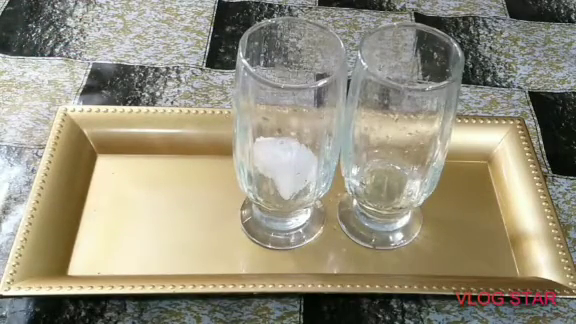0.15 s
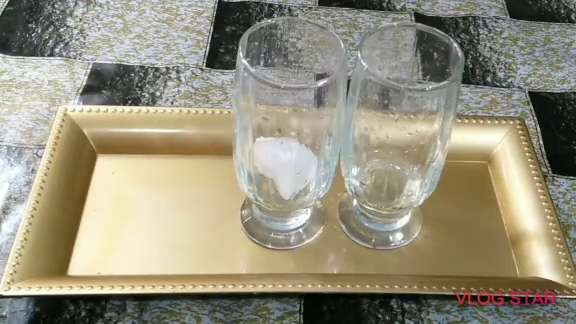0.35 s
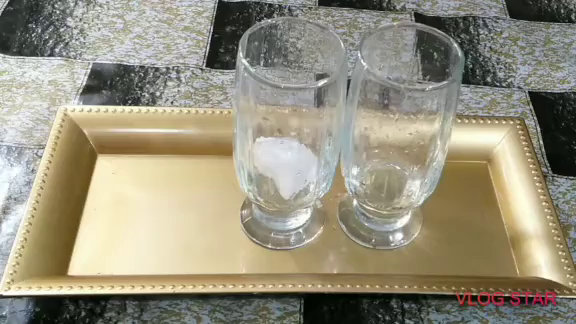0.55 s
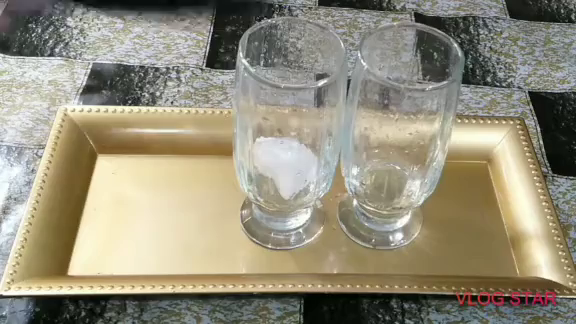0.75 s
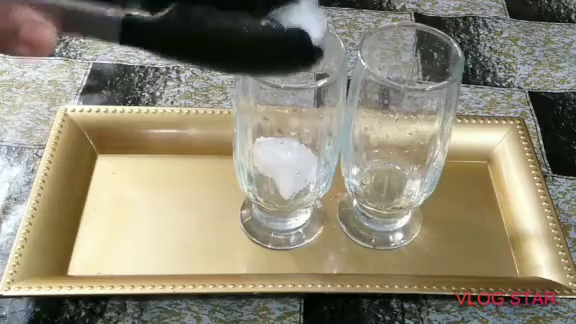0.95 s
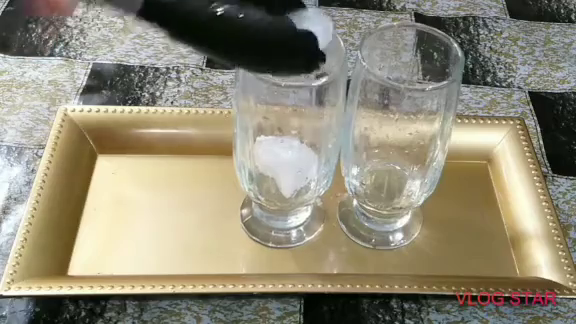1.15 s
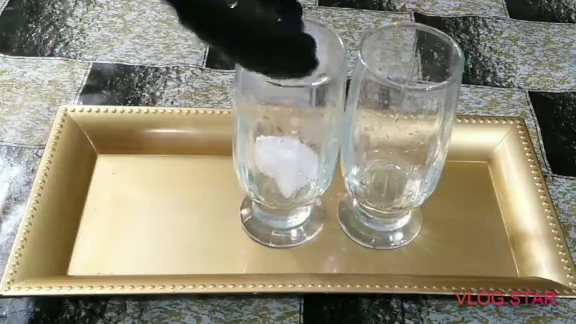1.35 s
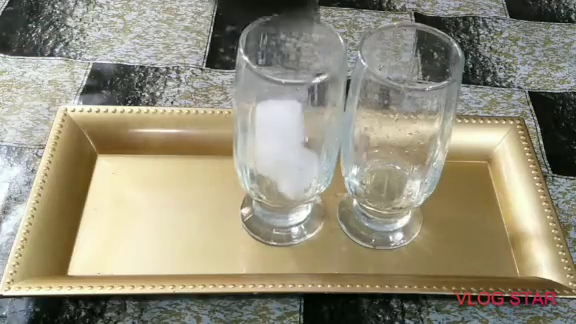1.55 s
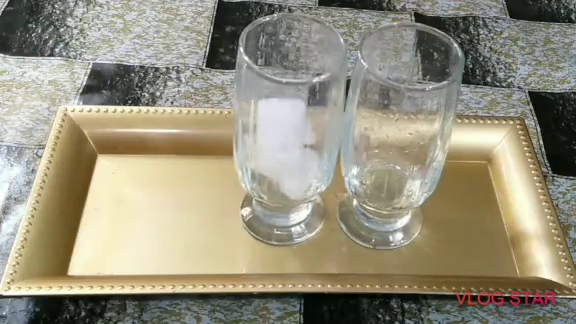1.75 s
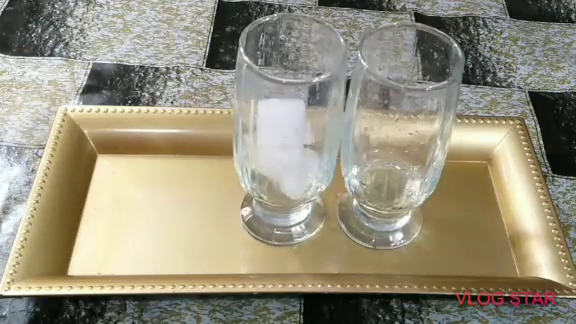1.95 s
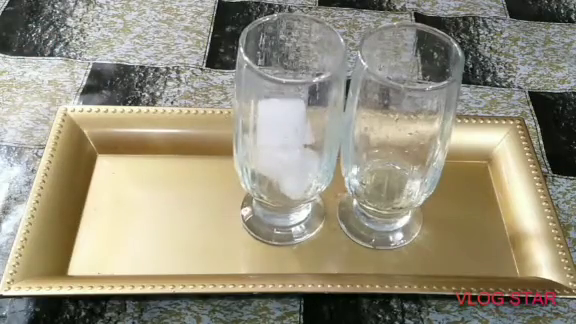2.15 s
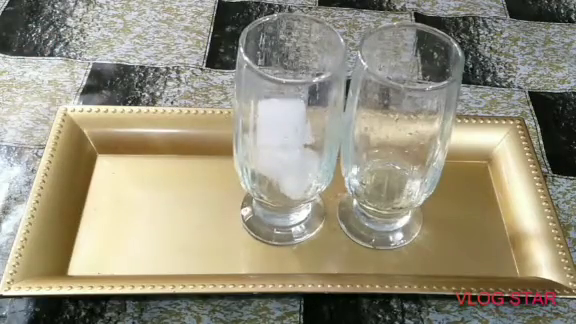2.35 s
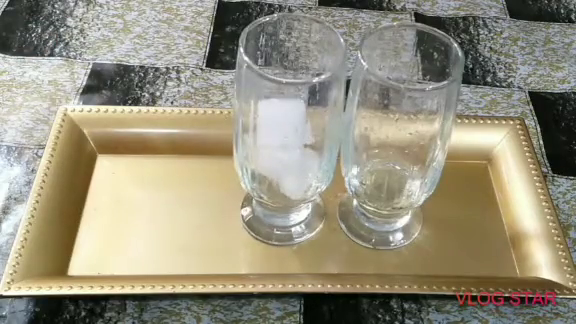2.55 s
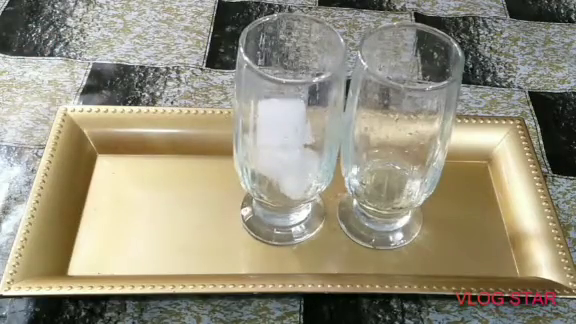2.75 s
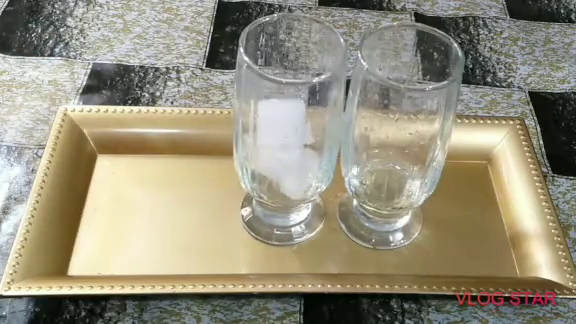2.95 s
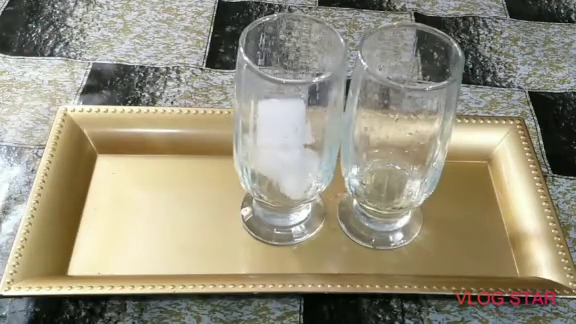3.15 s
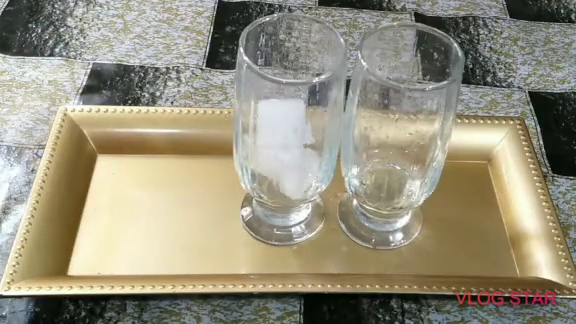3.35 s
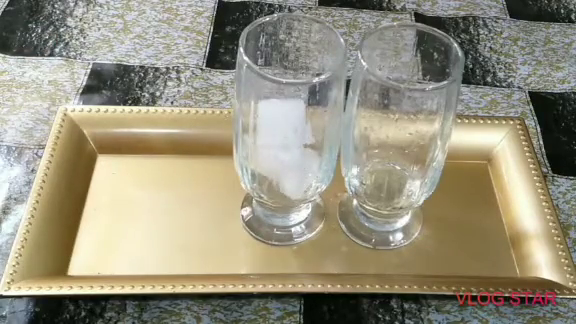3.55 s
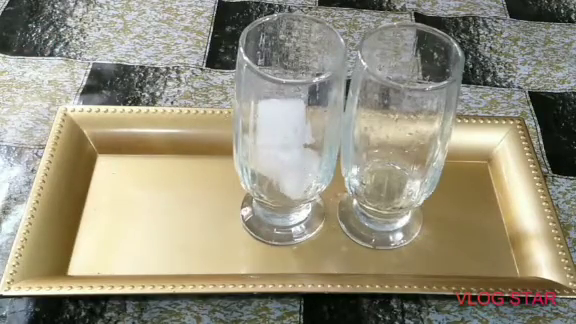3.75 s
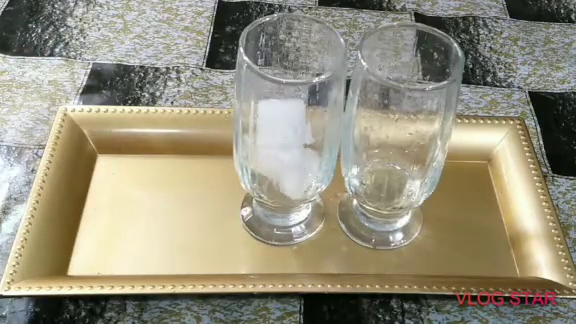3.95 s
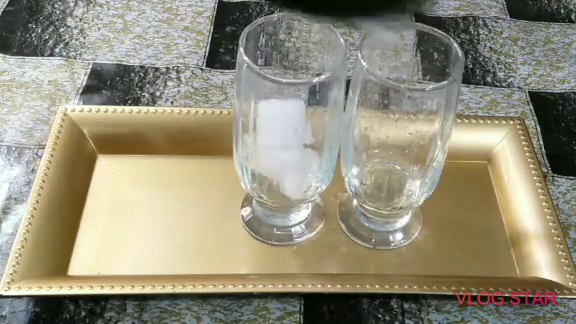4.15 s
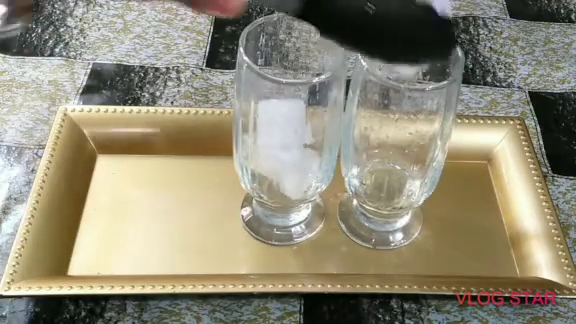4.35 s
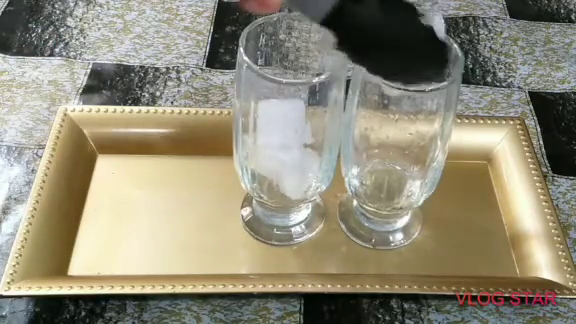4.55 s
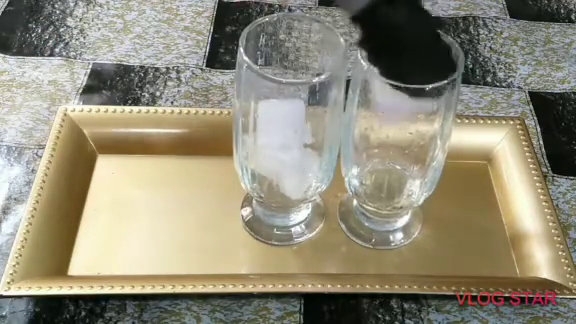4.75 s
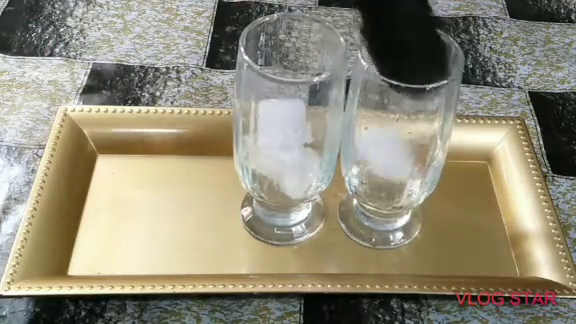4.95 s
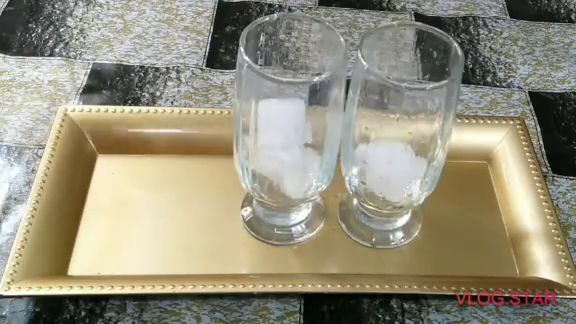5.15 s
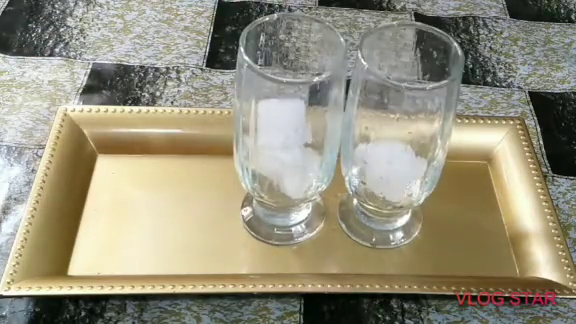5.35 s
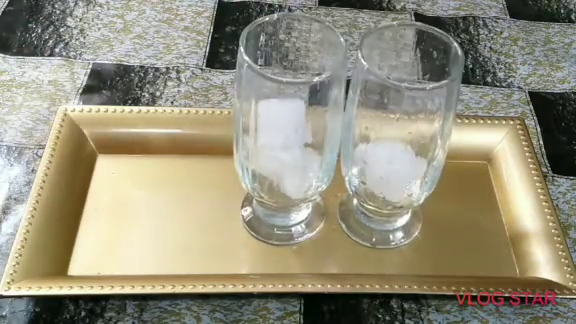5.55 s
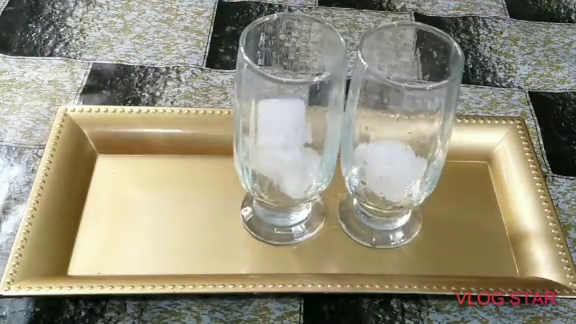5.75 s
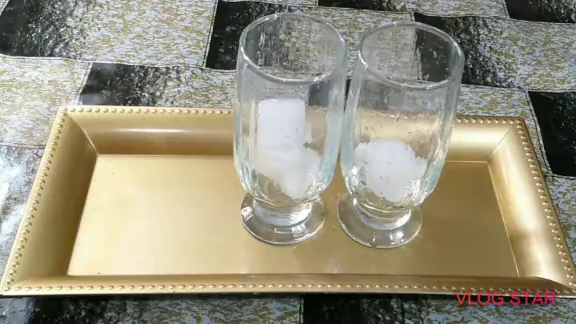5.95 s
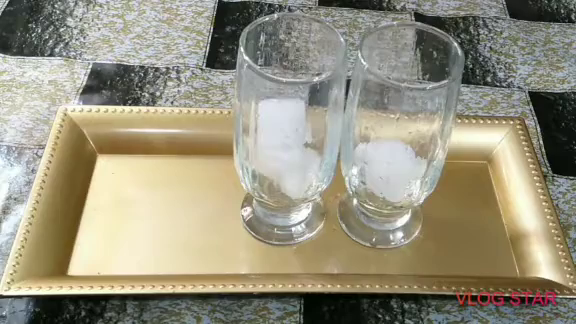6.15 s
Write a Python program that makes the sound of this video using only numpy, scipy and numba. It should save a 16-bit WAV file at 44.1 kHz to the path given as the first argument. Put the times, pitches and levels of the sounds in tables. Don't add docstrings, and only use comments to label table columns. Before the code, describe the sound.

A phone-close stereo take of ice being served: light rustling, faint touches on glass, then a sharp crack and glassy ring that dies fast as ice leans on the wall. Gritty scooping in crushed ice follows, peaking midway. Small ticks lead to another, rounder drop into the second glass with a low table thump. Crunchy digging closes it, over soft room hush and low hum.

```python
import sys
import numpy as np
from scipy import signal
from scipy.fft import rfft, irfft
from scipy.io import wavfile
from scipy.ndimage import uniform_filter1d, map_coordinates
from numba import njit

SR = 44100
rng = np.random.default_rng(int(sys.argv[2]) if len(sys.argv) > 2 else 0)


def invert_db(x):
    u = np.asarray(x, float) / 20
    return 10 ** u


def transcribe(signal):
    frames = np.atleast_2d(signal).T
    limited = np.clip(frames, -1, 1)
    pcm = np.round(limited * 32767).astype(np.int16)
    wavfile.write(sys.argv[1], SR, pcm)


N = 272846
T = np.arange(N) / SR


def level(x, db):
    return x * invert_db(db) / np.sqrt(np.mean(x ** 2))


def colour(x, points, share=1):
    hz, db = np.transpose(points)
    bins = np.maximum(np.fft.rfftfreq(N, 1 / SR), 1)
    return irfft(rfft(x) * invert_db(share * np.interp(np.log(bins), np.log(hz), db)), N)


def band(x, lo_hz, hi_hz):
    sos = signal.butter(2, [lo_hz, min(hi_hz, .45 * SR)], "band", fs=SR, output="sos")
    return signal.sosfilt(sos, x)


def wide(likeness):
    mid, side = rng.standard_normal((2, N))
    return np.array([mid + (1 - likeness) * side, mid - (1 - likeness) * side])


def wander(size, db):
    return level(uniform_filter1d(rng.standard_normal(N), size=size), db)


def swells(s, db, swell_s, fade_s, span_db):
    power = np.zeros(N)
    for at, top_db, up, down in zip(s, db, swell_s, fade_s):
        rise = ((at - T) / max(up, .005)) ** 2
        fall = (T - at) / max(down, .005)
        power += invert_db(2 * (top_db - span_db * np.where(T < at, rise, fall)))
    return np.sqrt(power)


@njit
def ring(push, hz, loss_db):
    out, z = np.empty(len(push), np.complex128), 0j
    for i in range(len(push)):
        if push[i] != 0 or abs(z) > 1e-7:
            z = z * np.exp((2j * np.pi * hz[i] - loss_db[i] * np.log(10) / 20) / SR) + push[i]
        out[i] = z
    return out


def room_hush():
    # (f/Hz, level/dB per Hz)
    hush_colour = [(71, -32.5), (120, 2), (180, -4.5), (240, -4), (306, -10), (415, -8), (1650, -30.5),
                   (4570, -29), (15500, -51)]
    return level(band(colour(wide(0.51), hush_colour), 68, 16000), -71)


def fridge_hum():
    # (f/Hz, level/dB)
    hum_tones = [(236.9, -77.5), (355.3, -88.5), (414.5, -83), (532.9, -86.5), (592.2, -98)]
    out = np.zeros(N)
    for hz, db in hum_tones:
        waver = 1 + .3 * wander(4000, 0)
        out += invert_db(db + 3.5) * waver * np.sin(2 * np.pi * hz * T + 6 * rng.random())
    return out


def rumble():
    # (t/s, table level/dB, tray level/dB, time to fall 20 dB/s)
    bumps = [(.33, -71.5, -100, 1.53), (.72, -61, -68, 0.1), (1.11, -54.5, -54.5, -0.18),
             (1.168, -53, -75.5, -0.07), (1.53, -55.5, -72, 0.4), (1.59, -40, -48, 0.11),
             (1.73, -53, -67, -0.57), (1.91, -70, -87.5, .5), (2.46, -72, -75, 0.8),
             (3.22, -62.5, -74.5, 0.86), (3.96, -63.5, -73, -0.83), (4.12, -61, -78, -0.53),
             (4.37, -60.5, -72, 0.27), (4.45, -55.5, -63.5, 0.32), (4.569, -62, -60.5, 0.5),
             (4.716, -56, -61, 0.23), (4.919, -44, -49, 0.13), (4.981, -37, -35, 0.1633),
             (5.07, -50.5, -51, -0.31), (5.141, -42.5, -49.5, -0.3), (5.27, -68, -79, -1.8),
             (5.62, -57, -72, .2), (5.73, -54, -77.5, 0.05), (6.04, -53, -68, 0.44), (6.15, -55, -70, 0.55)]
    s, table_db, tray_db, fade_s = np.transpose(bumps)
    fade_s = fade_s.clip(.07)
    swell_s = 0.32 * fade_s
    table, tray = wide(.8), wide(.8)
    table = level(band(band(table, 48, 72), 33, 100), 0)
    tray = level(band(tray, 84, 112), 0) * 0 + tray_shake(tray)
    table_gain = invert_db(-83) + swells(s, table_db, swell_s, fade_s, 20)
    tray_gain = invert_db(-78.5) + swells(s, tray_db, swell_s, fade_s, 20)
    return table * table_gain + tray * tray_gain


def loose_chips():
    # (f/Hz, level/dB per Hz)
    ice_colour = [(240, -45.5), (520, -18.5), (780, -26), (1130, -24), (1930, -12), (3260, -8.5),
                  (4580, -2), (11200, -22), (16000, -20)]
    sizes = (rng.random(N) < 4000 / SR) * invert_db(3 * rng.exponential(size=N))
    bunches = invert_db(1.3 * wander(300, 0))
    density = 3.0 + level(uniform_filter1d(sizes, size=40), 0)
    drift = uniform_filter1d(uniform_filter1d(rng.standard_normal(N), size=5000), size=5000)
    late = (T - .00017 - .00005 * level(drift, 0)) * SR
    bands = []
    for lo_hz, hi_hz in (260, 2600), (2300, 7800), (6800, 15000):
        pair = colour(wide(0.097) * density * bunches, ice_colour)
        pair = [port + 0.43 * map_coordinates(port, [late], order=3) for port in pair]
        bands.append(level(band(pair, lo_hz, hi_hz), 0))
    return bands


def digging():
    # (peak t/s, level/dB, swell/s, fade/s, low scrape relative level/dB)
    digs = [(1.44, -50, 0.041, 0.18, -1), (2.43, -46, 0.082, .3, -12.5), (2.49, -38, 0.14, 0.27, -16.5),
            (2.66, -48, 0.21, 0.17, -29), (2.72, -64, 0.071, .2, -21), (2.895, -65, 0.013, 0.28, -21),
            (2.92, -53, 0.027, 0.36, -24.5), (2.97, -54, .08, 0.49, -25), (3.035, -43, 0.076, 0.38, -18),
            (3.085, -45.5, 0.04, 0.33, -2.5), (3.13, -38, 0.095, 0.32, -9.5),
            (3.19, -41.5, 0.16, 0.37, -4.5), (3.26, -41.5, 0.11, 0.22, -4), (3.3, -34, 0.0074, 0.14, -10),
            (3.33, -36, 0.066, 0.16, -13), (3.43, -50, 0.034, 0.21, -22.5), (3.49, -48.5, 0.092, 0.19, -15),
            (3.57, -55.5, 0.0065, .14, -20), (3.848, -60.5, 0.0067, 0.13, -4),
            (4.111, -75.5, 0.0051, .15, -11.5), (4.238, -63, 0.0061, .12, -27),
            (4.548, -50, 0.0088, 0.089, -14.5), (4.8, -57, 0.011, 0.077, -14),
            (4.94, -42.5, 0.098, 0.015, -27), (5.949, -46.5, 0.013, 0.35, -27),
            (5.97, -41, 0.033, 1, -11.5), (6.066, -39.5, 0.11, 0.091, -8), (6.112, -36, 0.079, 0.66, -6.5),
            (6.187, -32, 0.19, .55, -9.5)]
    rustles = [(.016, -49, 0.13, 0.15, -7), (.096, -43.5, 0.11, 0.18, -2.5), (.195, -47.5, 0.52, 0.14, -9),
               (.35, -73.5, 0.58, 0.19, 4), (.936, -66, 0.012, 0.19, -9), (2.75, -62.5, 0.035, 0.081, -30),
               (4.538, -64.5, 0.024, 0.033, 0.5), (4.64, -77.5, 0.14, 0.13, -10),
               (4.69, -64.5, 0.019, 0.16, 1), (4.772, -55.5, 0.028, .15, -8)]
    slides = [(.576, -63, 0.041, 0.25, -10), (.67, -78, 0.17, 0.33, 8.5), (2.23, -66, 0.096, 0.44, -3.5),
              (3.692, -62, 0.0058, 0.19, -27.5), (3.96, -81.5, 0.19, 0.15, -4),
              (4.47, -82, 0.41, 0.42, 0.5), (4.882, -31, 0.072, 0.04, -22), (5.14, -52, 0.14, 0.093, 0.5),
              (5.6, -89, 0.42, 2.4, 7.5)]
    # (f/Hz, level/dB)
    rustle_tilt = [(2600, -2), (4500, -12.5), (6500, 9.5), (9000, 10.5)]
    low, mid, high = loose_chips()
    out = np.zeros((2, N))
    for rows, body, hiss_db in (digs, mid, -1.5), (rustles, colour(mid, rustle_tilt), 5.5), (slides, mid, -28):
        s, db, swell_s, fade_s, low_db = np.transpose(rows)
        out += swells(s, db, swell_s, fade_s, 40) * (body + invert_db(hiss_db) * high)
        out += swells(s, db + low_db, swell_s, fade_s, 40) * low
    return out


def short_rings():
    # (t/s, peak level/dB, f/Hz, time to fall 60 dB/s)
    rings = [(.932, -59, 6000, .05), (1.195, -40.5, 1820, 0.14), (1.196, -40.5, 4540, 0.057),
             (1.409, -72, 4100, .05), (1.433, -50.5, 3546, 0.059), (1.529, -21, 4780, 0.074),
             (2.409, -43, 4550, .02), (2.649, -34, 4520, 0.022), (2.746, -48, 4356, 0.022),
             (2.919, -48.5, 3730, 0.035), (3.318, -39.5, 1902, 0.086), (3.567, -49.5, 3870, 0.037),
             (3.689, -54, 5060, 0.046), (3.846, -58, 2290, 0.075), (4.109, -62, 6720, 0.045),
             (4.235, -54, 5464, 0.072), (4.543, -33.5, 4890, 0.048), (4.545, -38, 6100, 0.047),
             (4.692, -48.5, 1700, 0.071), (4.692, -47.5, 2800, .06), (4.771, -47.5, 4930, 0.1),
             (4.8465, -32, 4200, 0.055), (4.863, -30, 2980, 0.12), (4.8805, -39, 5040, .06),
             (4.952, -18.5, 1997, 0.077), (4.9525, -25.5, 2990, 0.085), (4.953, -29.5, 4690, .05),
             (5.113, -42.5, 2330, .05), (5.1135, -42.5, 4180, .05), (1.64, -42, 820, .12),
             (1.695, -46, 820, .15), (6.08, -53, 870, .12), (6.118, -49.5, 880, .1), (6.144, -43, 460, .15),
             (6.168, -46, 640, .1), (1.068, -54, 860, 0.079), (1.09, -58.5, 718, .15),
             (1.33, -60.5, 4210, 0.048), (3.078, -55, 505, 0.077), (3.241, -48, 480, .08)]
    out, t = np.zeros((2, N + 8192)), T[:8192]
    for (s, db, hz, t60), (apart, lag) in zip(rings, rng.random((60, 2))):
        upper_hz = hz * (1.02 + .03 * apart)
        pair = np.array([np.sin(2 * np.pi * hz * t + phase) + 1.2 * np.sin(2 * np.pi * upper_hz * t - phase)
                         for phase in (lag, -lag)])
        fade = invert_db(db - 60 * t / max(t60, .01)) * np.clip(t / 0.0012, 0, 1)
        out[:, int(s * SR):][:, :len(t)] += fade * pair
    return out[:, :N]


def cracks():
    # (t/s, peak level/dB, f/Hz)
    contacts = [(0.9316, -51, 6400), (1.5253, -24, 4740), (1.5714, 7, 5850), (2.7473, -49, 4370),
                (2.92, -44, 3650), (3.2983, -19, 4520), (3.5665, -48, 3920), (3.691, -54, 5050),
                (4.235, -57, 5460), (4.542, -26, 5130), (4.828, -30.5, 5320), (4.9514, 1, 2970),
                (5.113, -28, 3700)]
    out, t = np.zeros(N), T[:256]
    for s, db, hz in contacts:
        turns = t * hz - 1.5
        out[int(s * SR):][:len(t)] += invert_db(db - 1.0) * np.sin(2 * np.pi * turns) * np.exp(-(turns / 0.56) ** 2)
    return out


def rattle(db, hz, t60, fall_db):
    t = T[:16384]
    bins = np.maximum(np.fft.rfftfreq(len(t), 1 / SR), 1)
    mid, side, patches, peaks, bounce = rng.standard_normal((5, len(t)))
    octaves = np.log2(bins / hz)
    below_db = 6 * octaves - 12 * np.maximum(np.log2(900 / bins), 0)
    slope_db = np.where(octaves < 0, below_db, -fall_db * octaves)
    slope_db -= 11.5 * np.maximum(np.log2(bins / 8500), 0)
    slope_db += level(uniform_filter1d(patches, size=180), 11)[:len(bins)]
    slope_db += level(uniform_filter1d(peaks, size=24), 13)[:len(bins)]
    noise = rfft([mid + 1.1 * side, mid - 1.2 * side])
    out = level(irfft(noise * invert_db(slope_db), len(t)), db - 13.0)
    skips_db = level(uniform_filter1d(bounce, size=200), 12)
    return out * invert_db(skips_db - 60 * t / max(t60, .02)) * (1 - np.exp(-(t / .0012) ** 2))


def air_column(puff, rattling):
    # (t/s, f/Hz)
    air_pitch = [
        (1.075, 885),
        (1.092, 735),
        (1.5, 780),
        (1.62, 815),
        (1.9, 827),
        (4.9, 652),
        (4.945, 685),
        (5.1, 714),
        (6.0, 500),
    ]
    swell = np.hanning(int(0.00792 * SR))
    swell = swell / swell.sum() * np.exp(2j * np.pi * 740 * T[:len(swell)])
    push = np.convolve(puff, swell)[:N] + invert_db(-45) * rattling.mean(axis=0)
    air_hz = np.interp(T, *np.transpose(air_pitch)) * (1 + wander(400, -27.5))
    air = ring(push, air_hz, np.full(N, 60 / .085))
    air += invert_db(-10.0) * ring(push, 1.4 * air_hz, np.full(N, 900.))
    return band(band(air.imag, 440, 990), 450, 1500) * invert_db(np.array([[1.5], [-1.5]]))


def knocks():
    # (t/s, rattle level/dB, centre f/Hz, air level/dB, time to fall 60 dB/s)
    drops = [(1.0695, -58.5, 1500, -80, 0.32), (1.1124, -60, 3940, -78, 0.14),
             (1.1896, -29, 3300, -61, 0.15), (1.1987, -21.5, 3070, -60, 0.16),
             (1.2185, -30.5, 2970, -80, 0.098), (1.318, -57, 3960, -86, 0.22),
             (1.408, -50, 4150, -90.5, 0.22), (1.528, -10, 4842, -30, 0.27), (1.568, 0, 6820, -40, 0.11),
             (1.5802, -2, 6624, -46, 0.082), (1.6021, -9, 5790, -53.5, 0.27),
             (1.6219, -24.5, 3538, -42, 0.32), (1.6712, -15.5, 3620, -43, 0.15),
             (1.7177, -22.5, 3350, -47.5, 0.18), (1.7748, -41.5, 3270, -64, 0.26),
             (4.5426, -32, 5920, -62.5, 0.16), (4.6914, -30.5, 3800, -65, 0.16),
             (4.769, -31, 5200, -77, 0.12), (4.8262, -33, 5180, -70.5, 0.17),
             (4.8485, -26.5, 3000, -68, 0.3), (4.8642, -20, 3002, -70, .15),
             (4.8807, -13.5, 4920, -47, 0.11), (4.8944, -38, 3110, -38.5, 0.151),
             (4.9505, -10, 2263, -20, 0.1), (4.9894, -26, 2095, -50.5, 0.32),
             (5.0296, -41, 2110, -50.5, 0.16), (5.0779, -38.5, 7200, -62, 0.34),
             (5.098, -33, 3520, -56.5, 0.13), (5.1116, -44, 3520, -50, 0.12), (5.135, -60, 4000, -58, .15)]
    # (t/s, rattle level/dB, centre f/Hz, hollow level/dB, treble fall/dB per octave)
    ticks = [(0.0922, -24.5, 5540, -49, 25), (0.932, -50, 6000, -82, -9), (2.6484, -64, 4480, -71.5, 18),
             (2.7444, -70, 4290, -91, 8), (2.9174, -44, 3700, -86.5, 6.5), (3.3242, -25, 4870, -74, 10),
             (3.5672, -63, 3900, -91.5, 18), (3.689, -49, 5160, -84, 1.5),
             (3.8454, -47.5, 2257, -95.5, 3.5), (4.11, -52.5, 6820, -89.5, 3.5),
             (4.2346, -43.5, 5520, -82, -3), (5.9494, -53, 4810, -75, 4), (6.1484, -39, 4720, -60, 11)]
    events = [(*row, 12 + 4 * np.log2(row[2] / 4000)) for row in drops]
    events += [(*row[:4], 0.21, row[4]) for row in ticks]
    out, puff = np.zeros((2, N)), np.zeros(N, complex)
    for s, db, hz, air_db, t60, fall_db in sorted(events):
        i = int((s - .0005) * SR)
        one = rattle(db, hz, t60, fall_db)
        out[:, i:i + one.shape[1]] += one[:, :N - i]
        puff[i] = invert_db(air_db + 8.0)
    return out + air_column(puff, out)


def glass(pitches, modes, blows, rests, spare_lows):
    family_edges_hz = (2500, 5000)
    s, *family_db, twin = np.transpose(blows)
    at = (s * SR).astype(int)
    leaning = np.interp(T, *np.transpose(rests)).clip(0)
    touch = np.hanning(int(0.00086 * SR))
    touch = touch / touch.sum()
    wobble = wander(500, -54)
    out = np.zeros((2, N))
    last_hz = 0
    for hz, (db, t60, pan_db, lead) in zip(pitches, modes):
        paired, last_hz = abs(hz - last_hz) < 25, hz
        spot = spot if paired else rng.standard_normal((len(s), 2)).T
        blow_db = db + family_db[np.digitize(hz, family_edges_hz)] + 2 * spot[0]
        push = np.zeros(N, complex)
        push[at] = invert_db(blow_db) * np.exp(1j * spot[1]) * (twin.clip(-1, 1) if paired else 1)
        push = np.convolve(push, touch * np.exp(2j * np.pi * hz * T[:len(touch)]))[:N]
        loss_db = 60 / t60 + leaning * min(hz / 3500, 1.2) ** spare_lows
        z = ring(push, hz * (1 + wobble * hz / 8000), loss_db)
        lag = np.exp(.5j * lead)
        out += [invert_db(pan_db / 2) * (z * lag).imag, invert_db(-pan_db / 2) * (z / lag).imag]
    return out


def right_glass():
    pitches = [1665.3, 1658.8, 3547, 3540, 6418, 7419, 5800, 7480, 8100, 10050, 12200, 13700, 14600]
    # (level/dB, time to fall 60 dB/s, left minus right/dB, left leads/rad)
    modes = [(0, 1.2, -3, .5), (0, 1.2, -3, .5), (3, 1.0, -3, .3), (3, .8, -3, .3), (-3, .2, 0, .5),
             (-2, .25, 0, .5), (-10, .1, 0, .5), (0, .15, 0, .5), (-4, .3, 0, .5), (-10, .2, 0, .5),
             (-10, .3, 0, .5), (-10, .3, 0, .5), (-12, .3, 0, .5)]
    # (t/s, low modes level/dB, middle level/dB, high level/dB, share of the twin modes -1..1)
    blows = [(1.192, -62, -46, -52, 0.16), (1.199, -62, -43, -50, 0.3), (1.213, -57, -46, -50, 0.4),
             (1.573, -32.5, -42.5, -28, 1), (1.598, -72, -11.5, -61.5, -0.77),
             (1.615, -69.5, -45, -33, -.5), (1.672, -75, -32, -36.5, -0.04), (1.723, -75, -56, -47, 0.73),
             (4.543, -58, -68, -53.5, .85), (4.689, -56, -54, -54, .85), (4.782, -61, -65, -61, .85),
             (4.876, -44.5, -42.5, -39.5, 0.82), (4.892, -42.5, -40.5, -37, 0.96),
             (4.951, -40, -43.5, -52.5, 0.58), (5.078, -80, -55, -45, 0.59), (5.112, -55, -61.5, -53, .7),
             (5.133, -85, -76, -54, .7)]
    # (t/s, extra loss/dB per s)
    rests = [(1.2, 260), (1.5, 100), (1.59, 29.7), (1.66, 40), (1.7, 121), (1.78, 148.4), (1.9, 220),
             (2.1, 298.9), (4.5, 645), (4.9, 600), (5.05, 503), (5.12, 201), (5.3, 300)]
    return glass(pitches, modes, blows, rests, spare_lows=1.37)


def left_glass():
    pitches = [1738.5, 1723, 2835, 3261, 3241, 5783, 7230, 7284, 7378, 8248, 4480, 5380, 6945, 7575, 9230,
               9560, 11900, 12300, 12600, 13310, 14200]
    # (level/dB, time to fall 60 dB/s, left minus right/dB, left leads/rad)
    modes = [(1.5, 1.0, -3.5, -0.78), (3, 1.0, -5, -1.4), (-3, .12, 1, -0.18), (8.5, 0.2, -1, -2.5),
             (9, .7, -2.5, -2.5), (7, 0.15, 12.5, -2.5), (6.5, .18, 3.5, 3.5), (1, 0.5, 3.5, 2.5),
             (1, 0.26, 3.5, 2), (-2, 0.22, 1.5, -0.43), (-18.5, .2, 0, .5), (-16, 0.15, 0.5, .5),
             (-8.5, .2, 0, .5), (-6, .15, 0.5, .5), (-17, .5, 3, 2.5), (-17, .2, -0.5, .5),
             (-20, .45, 0, .5), (-21, .4, 0, .5), (-21, .45, 0, .5), (-15.5, .45, 3, -2.5),
             (-23.5, .15, 0, .5)]
    # (t/s, low modes level/dB, middle level/dB, high level/dB, share of the twin modes -1..1)
    blows = [(1.067, -77, -97, -99, 0.27), (1.193, -54.5, -51.5, -55.5, 0.16), (1.198, -52, -54, -50, 0.61),
             (1.532, -33.5, -54, -38, 0.088), (1.571, -13, -17.5, -15, -0.48),
             (1.601, -45.5, -37, -22.5, 0.57), (1.645, -50, -42, -48.5, .5),
             (1.673, -54, -29.5, -33.5, 0.12), (1.723, -43, -32.5, -43.5, 0.91),
             (1.778, -56.5, -45.5, -56, 1), (4.692, -75, -64, -57.5, 0.5), (4.771, -71, -79, -56.5, 0.45),
             (4.88, -41.5, -51.5, -34, 0.87)]
    # (t/s, extra loss/dB per s)
    rests = [
        (1.2, 220),
        (1.5, 54.5),
        (1.6, 10),
        (1.68, 30),
        (1.7, 103.5),
        (1.77, 201),
        (1.84, 330.5),
    ]
    return glass(pitches, modes, blows, rests, spare_lows=0.17)


def room(x):
    t = T[:int(.5 * SR)]
    tail = band(rng.standard_normal((2, len(t))), 180, 6000)
    tail *= invert_db(-60 * t / 0.051) * np.clip(t / 0.0048 - .5, 0, 1)
    tail = tail / np.sqrt(np.sum(tail ** 2, axis=1, keepdims=True))
    return x + invert_db(-10.5) * signal.fftconvolve(x.mean(axis=0)[None], tail, axes=1)[:, :N]


def scene():
    background = room_hush() + fridge_hum() + rumble()
    ice = digging() + short_rings() + cracks() + knocks()
    return room(ice + right_glass() + left_glass()) + background


def discard(x):
    # (f/Hz, threshold over the neighbourhood/dB, threshold under the loudest band/dB)
    limits = [(3000, -14, -60), (6000, -8, -42), (9000, -2, -33), (10800, 0, -28), (12500, 2, -37),
              (16000, 3, -34)]
    hz, _, cells = signal.stft(x, SR, nperseg=2048)
    limit_hz, near, under = np.transpose(limits)
    near_db = np.interp(hz, limit_hz, near)[:, None]
    under_db = np.interp(hz, limit_hz, under)[:, None]
    power = np.abs(cells) ** 2
    bands = power[:, 1:].reshape(2, 32, 32, -1).mean(axis=2)
    loudest = bands[:, 2:].max(axis=1, keepdims=True)
    luck_db = 6 * rng.standard_normal(bands.shape[1:]).repeat(2, axis=1)[:, :bands.shape[2]]
    at = np.minimum(np.arange(len(hz)) // 32, 31)
    stands_out = power > bands[:, at] * invert_db(2 * near_db)
    band_heard = bands[:, at] > loudest * invert_db(2 * (under_db + luck_db[at]))
    keep = (stands_out & band_heard) | (hz < limit_hz[0])[:, None]
    return signal.istft(cells * keep, SR)[1][:, :N]


def tray_shake(noise):
    return level(band(band(noise, 84, 112), 68, 120), 0) + level(band(noise, 140, 300), -18)


def top_cut(x):
    return signal.sosfilt(signal.butter(12, 16390, fs=SR, output="sos"), x)


def record(dry):
    # (f/Hz, left minus right/dB)
    port_colour = [(60, 0.5), (110, -1), (200, 0), (380, -4.5), (700, -1.5), (1290, -0.5), (2380, -2),
                   (4400, -5.5), (8120, 4), (15000, 1.5)]
    # (f/Hz, level/dB)
    mic_top = [(20, 0.5), (9000, -2.5), (12000, -0.5), (15000, -6), (15900, -12.5), (16300, -29),
               (16700, -57), (22050, -80)]
    ports = np.array([colour(dry[0], port_colour, 0.32), colour(dry[1], port_colour, -0.47)])
    mix = discard(colour(np.clip(ports, -1, 1), mic_top))
    return top_cut(np.clip(mix, -1, 1))


dry = scene()
out = record(dry)
transcribe(out)
```